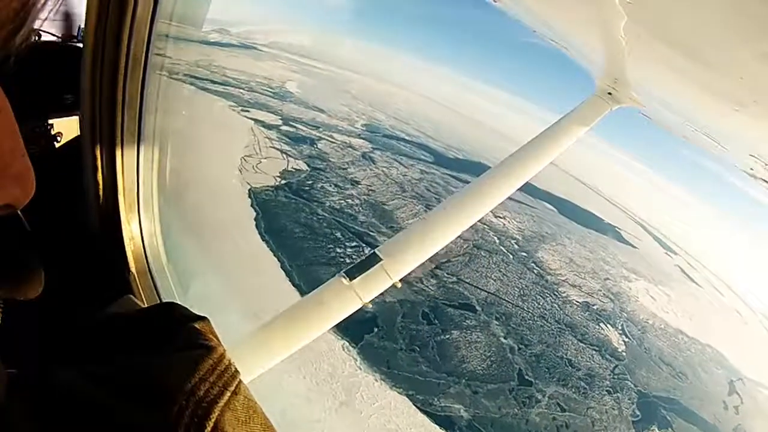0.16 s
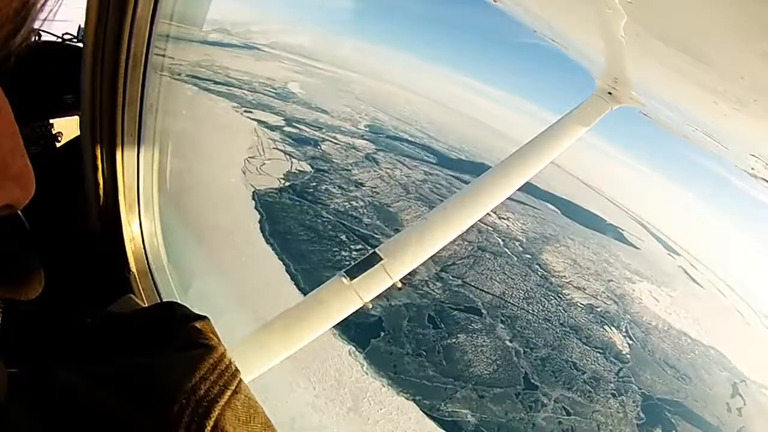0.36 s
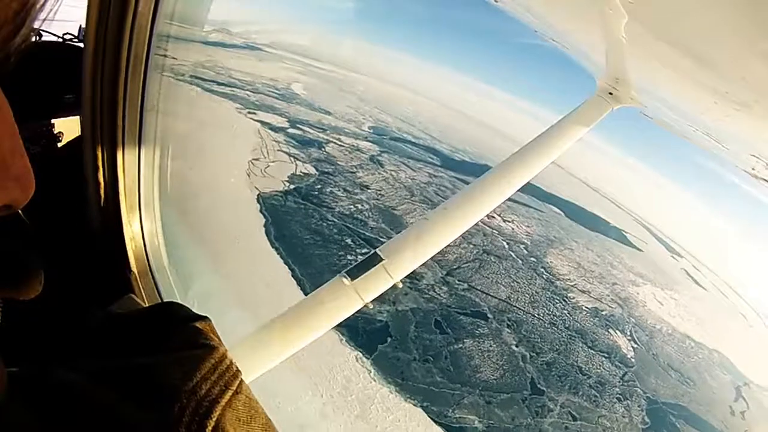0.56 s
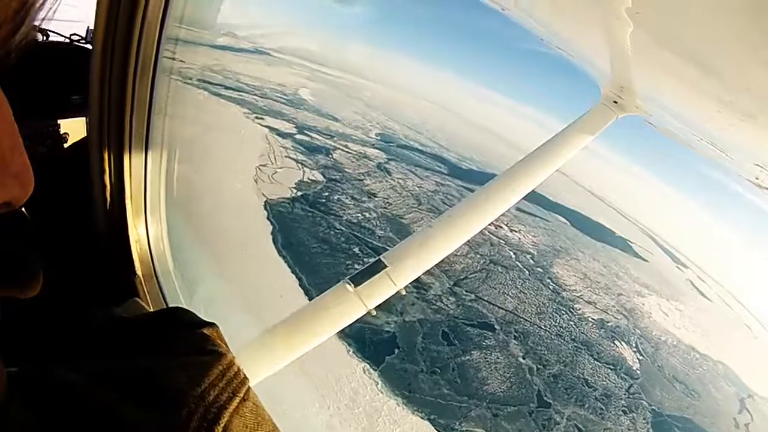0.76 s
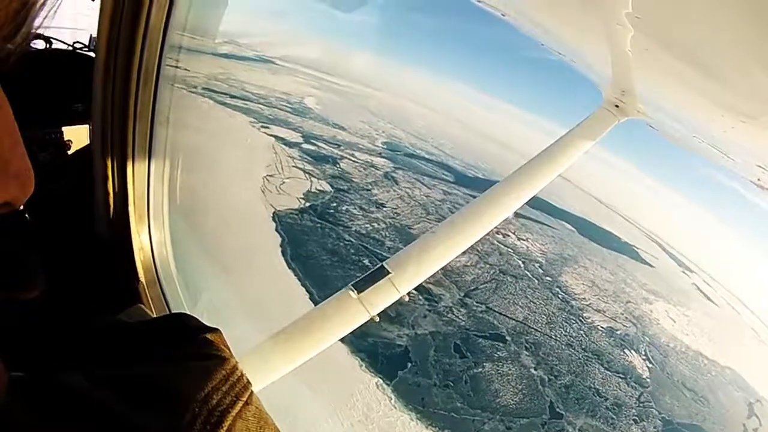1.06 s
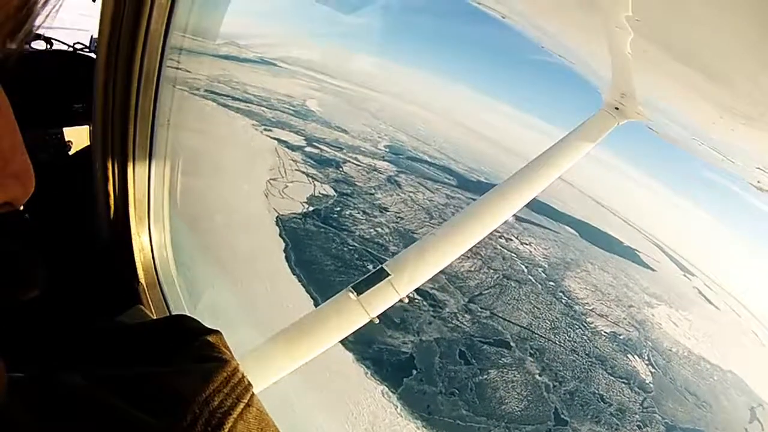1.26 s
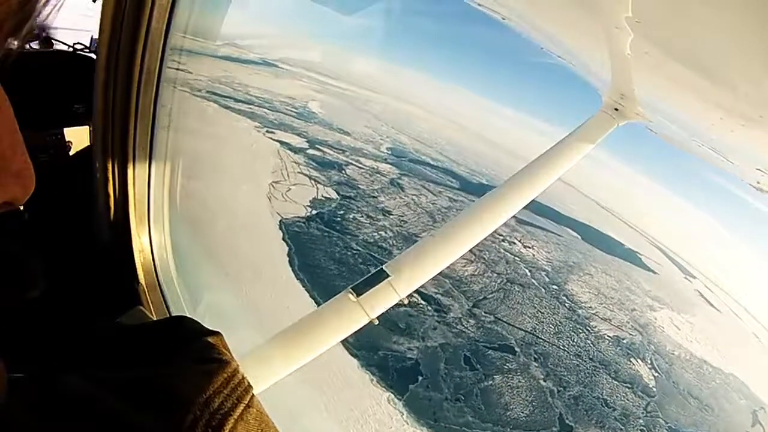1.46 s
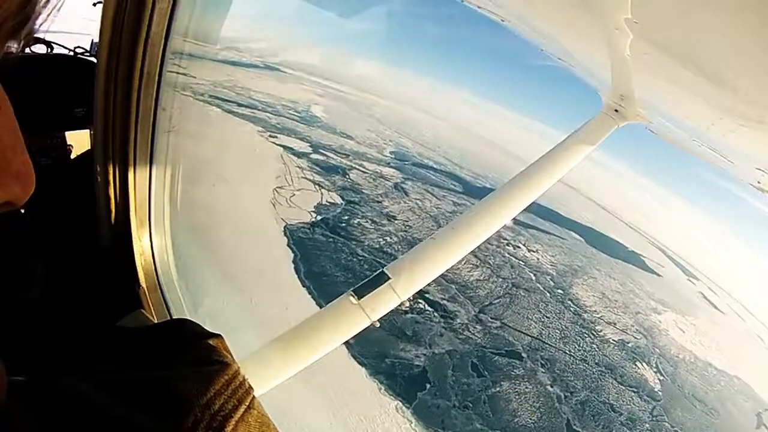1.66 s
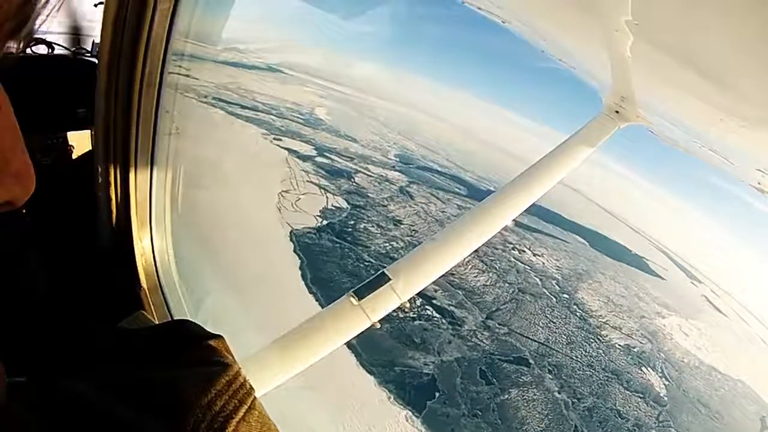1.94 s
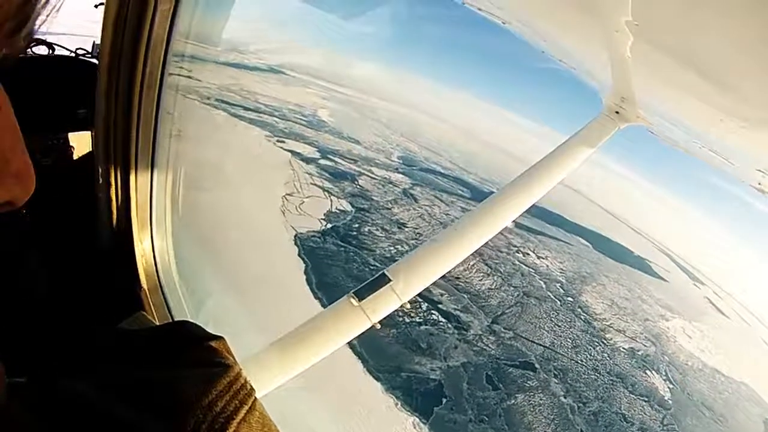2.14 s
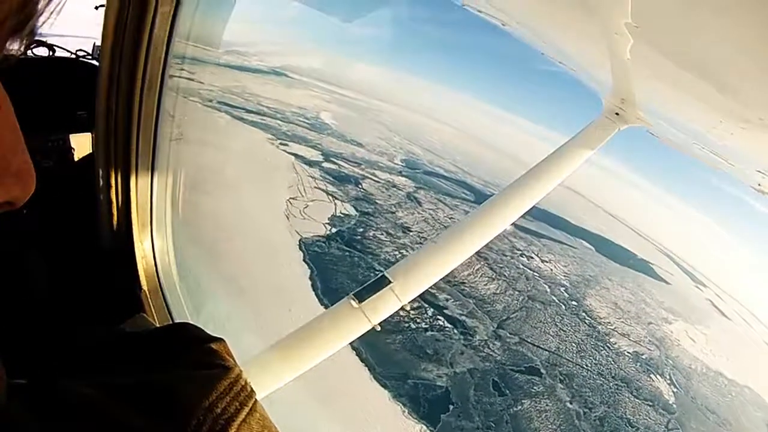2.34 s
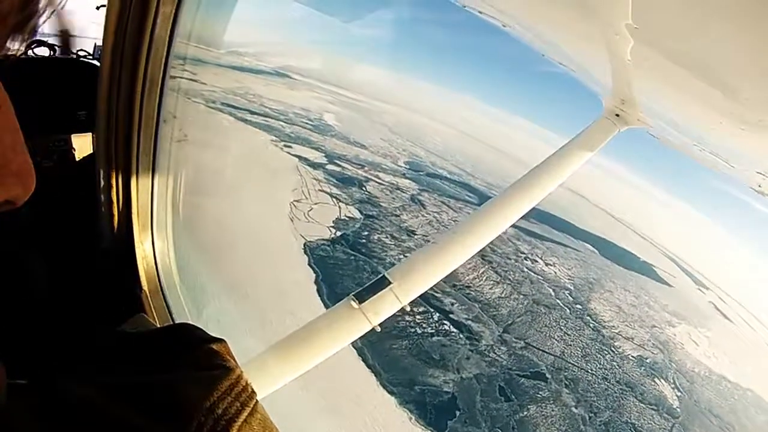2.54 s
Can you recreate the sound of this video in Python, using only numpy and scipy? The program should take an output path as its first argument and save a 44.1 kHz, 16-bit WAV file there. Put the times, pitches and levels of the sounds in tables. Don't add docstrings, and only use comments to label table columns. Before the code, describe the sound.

Constant low, throbbing engine drone inside a small plane in flight, with rattling panels and dull wind roar beneath; a muffled microphone clips with irregular ticks and thumps, its level briefly ducking and recovering.

```python
import sys
import numpy as np
from scipy import signal
from scipy.io import wavfile
from scipy.ndimage import uniform_filter1d

SR = 44100
rng = np.random.default_rng(int(sys.argv[2]) if len(sys.argv) > 2 else 0)


def master_out(mix):
    frames = np.transpose(np.atleast_2d(mix))
    ceiling = np.clip(frames, -1, 1)
    pcm = np.round(ceiling * 32767).astype(np.int16)
    wavfile.write(sys.argv[1], SR, pcm)


def invert_db(x):
    u = np.asarray(x, float) / 20
    return 10 ** u


N = 119070

# t/s, f/Hz
FIRING_RATE = [
    (0, 83.05),
    (.5, 83.03),
    (1.08, 82.8),
    (1.66, 82.96),
    (2.3, 83.15),
    (2.7, 83.15),
]
# multiple of the firing rate, level/dB
ORDERS = [(.25, -13), (1, 4.5), (1.25, -4.5), (1.75, -12), (2, 0), (2.5, -15), (2.75, -18), (3, -4),
          (3.25, -8.5), (4, -2), (5, -3.5), (5.25, -9.5), (6, -5.5), (6.5, -10), (6.75, -9.5), (7, -5),
          (7.25, -8), (7.75, -4), (8, -10.5), (8.75, -13.5), (8.25, -13.5), (9, -9.5), (9.5, -16.5),
          (10, -18), (11.25, -20.5), (12, -21), (15, -34)]
# level/dB, lateness/ms
CYLINDER_KNOCKS = [
    (0.5, 2.5),
    (0, 1.17),
    (-5, -1.5),
    (-6, 0.75),
]
# f/Hz, bandwidth/Hz, level/dB
PANEL_MODES = [
    (237.6, 20, 2.5),
    (403, 60, -14.5),
    (620, 130, 2),
    (810, 60, -6.5),
    (860, 160, -24.5),
]
# f/Hz, level/dB
ROAR_SPECTRUM = [
    (26, -16),
    (72, -10),
    (205, -1),
    (650, -0.5),
    (1210, -23),
    (2450, -38.5),
    (2950, -47.5),
    (3400, -44.5),
]
# t/s, tick level/dB, crack level/dB, gain drop/dB
OVERLOAD_EVENTS = [(0.035, -61, -66, 7.5), (0.0824, -62.5, -71, 11), (0.218, -67.5, -62, 6),
                   (0.3232, -61, -52.5, 2), (0.395, -63, -54, 8.5), (0.4569, -64, -64, 5.5),
                   (0.5036, -67, -59, 7.5), (0.6124, -58.5, -42.5, 8), (0.6499, -60, -61, 5.5),
                   (.698, -67, -56, 7), (.7935, -68, -45, 14.5), (0.89, -63, -65, 6.5),
                   (1.0048, -65, -52, 7), (1.1333, -64, -76, 5), (1.2887, -62, -63, 13),
                   (1.3245, -62.5, -60, 9), (1.3738, -61.5, -70, 13), (1.518, -60.5, -64, 9.5),
                   (1.6144, -62, -47, 10.5), (1.6503, -62, -63, 8), (1.8087, -61, -57, 5.5),
                   (1.87, -63, -59, 9.5), (1.952, -65.5, -45.5, 12.5), (2.0494, -61, -65, 7),
                   (2.1449, -66, -59, 10.5), (2.193, -58, -46, 14.5), (2.2717, -61.5, -58, 2.5),
                   (2.4822, -61, -53, 8), (2.5908, -60, -45, 11), (2.6261, -61, -75, 14.5)]
# t/s, tick level/dB, gain drop/dB
LIGHT_TOUCHES = [(.009, -63, 4), (.1566, -68, 1), (.1777, -64, 2), (.2735, -68, 1), (.3529, -68, 4),
                 (.3733, -66, 3), (.4206, -68, 1), (.4917, -67, 1), (.5519, -64, 4), (.7463, -64, 1),
                 (.8415, -66, 1), (.8689, -65, 1), (.9399, -66, 3), (.981, -67, 1), (1.0718, -66, 1),
                 (1.0821, -67, 2), (1.21, -65, 3), (1.2222, -68, 3), (1.2444, -68, 1), (1.3559, -68, 1),
                 (1.4481, -62, 6), (1.4729, -67, 2), (1.7047, -65, 4), (1.7531, -60, 3), (1.7727, -66, 1),
                 (1.8488, -68, 1), (1.8605, -67, 1), (2.0128, -62, 5), (2.1077, -66, 1), (2.2995, -68, 1),
                 (2.3205, -66, 7), (2.372, -66, 1), (2.3867, -61, 2), (2.4339, -61, 3), (2.5292, -59, 4),
                 (2.6733, -61, 2)]

CRANK_START = -.043
TONES_DB, PHASE_LEAN_RAD = -31.5, 0.99
WAVER_DB, WAVER_RAD = 1.6, .21
KNOCK_DB, KNOCK_SPREAD_DB, KNOCK_JITTER_MS = -33.5, 5, 0.2
KNOCK_RISE_MS = 0.65
ROAR_DB, PATCHY_DB, FLICKER_DB = -23, 0.5, 1.8
ROAR_SLOPE_DB_PER_OCT = -23
THROB_DB = 0.7
CYCLE_DB, CYCLE_RAD = 0.62, 3.3
SNAP_MS, RECOVER_MS = .33, 18
TICK_DB, TICK_HZ, CHATTER_MS, DULL_HZ = 29.5, 1500, 1.4, 8500
SMALL_TICK_DB, SMALL_SPREAD_DB = -50, 5
STRAY_PER_S, STRAY_DB = 750, -63.5
BLOW_DB, DIVE_MS, REBOUND_MS = -15, 1.3, 1.8
CRACK_DB, CRACK_HZ, CRACK_MS = 11, 1500, .5
LEAD = 2048
BASS_CUT_HZ, EDGE_HZ = 99, 10000
CEILING, FADE_MS = .56, 2


def evened(x):
    return x / np.sqrt(np.mean(x ** 2) + 1e-20)


def wander(rate_hz):
    t = np.arange(0, N + 32, 32) / SR
    rates = rate_hz * np.geomspace(.05, 1, 12)
    slow = sum(np.sin(2 * np.pi * (f * t + rng.random())) for f in rates)
    return np.interp(np.arange(N) / SR, t, evened(slow))


def firings():
    s, hz = np.transpose(FIRING_RATE)
    rate = np.interp(np.arange(N) / SR, s, hz)
    return np.cumsum(rate) / SR + 4 * CRANK_START


def tones(turns):
    out = np.zeros(N)
    for order, db in ORDERS:
        k = round(4 * order) / 4
        phase = 2 * np.pi * k * turns + PHASE_LEAN_RAD * np.log2(k) + WAVER_RAD * np.cbrt(k) * wander(8)
        out += invert_db(db + WAVER_DB * wander(9.3)) * np.cos(phase)
    return invert_db(TONES_DB) * np.sqrt(2) * out


def train(turns, level_db, late_ms):
    at = np.flatnonzero(np.diff(np.floor(turns)) > 0)
    delay = (late_ms[:len(at)] * SR / 1000).astype(int)
    out = np.zeros(N)
    out[np.clip(at + delay, 0, N - 1)] = invert_db(level_db[:len(at)])
    return out


def panels(turns):
    first = int(np.floor(turns[0]) + 1)
    db, late = np.roll(np.tile(CYLINDER_KNOCKS, (80, 1)), -first, axis=0).T
    luck = rng.standard_normal((len(db), 2))
    t = np.arange(3000) / SR
    ring = np.zeros(3000)
    for hz, width, level in PANEL_MODES:
        ring += invert_db(level) * np.exp(-np.pi * width * t) * np.sin(2 * np.pi * hz * t)
    ring *= 1 - np.exp(-(1000 * t / KNOCK_RISE_MS) ** 2)
    knocks = train(turns, db + KNOCK_SPREAD_DB * luck[:, 0], late + KNOCK_JITTER_MS * luck[:, 1])
    return invert_db(KNOCK_DB) * evened(signal.oaconvolve(knocks, ring)[:N])


def roar(turns):
    frames, hz = N // 256 + 5, np.fft.rfftfreq(1024, 1 / SR)
    real, imag, patches = rng.standard_normal((frames, 513, 3)).T
    patches = uniform_filter1d(patches, size=10, axis=0)
    patches = evened(uniform_filter1d(patches, size=8, axis=1))
    f, db = np.transpose(ROAR_SPECTRUM)
    octave = np.log2(hz + 1)
    above = np.maximum(octave - np.log2(f[-1]), 0)
    colour = np.interp(octave, np.log2(f), db) + ROAR_SLOPE_DB_PER_OCT * above
    spectrum = (real + 1j * imag) * invert_db(colour[:, None] + PATCHY_DB * patches)
    noise = signal.istft(spectrum, nperseg=1024, noverlap=768)[1][:N]
    flicker = FLICKER_DB * np.clip(wander(150), -2, 1.5)
    throb = THROB_DB * np.cos(2 * np.pi * turns)
    cycle = CYCLE_DB * np.cos(np.pi * turns / 2 + CYCLE_RAD)
    return invert_db(ROAR_DB + flicker + throb + cycle) * evened(noise)


def limiter_db():
    since, drop = np.arange(-441, 6000) * 1000 / SR, np.zeros(N)
    for s, *_, db in [*OVERLOAD_EVENTS, *LIGHT_TOUCHES]:
        drop[int(s * SR)] = max(db, 0)
    snap = .5 + .5 * np.tanh(since / SNAP_MS)
    creep = snap * np.exp(-abs(since) / RECOVER_MS)
    return -signal.oaconvolve(drop, creep)[441:441 + N]


def ticks(edge):
    t = np.arange(-100, 200) * 1000 / SR
    spell = signal.oaconvolve(edge, np.exp(-(t / CHATTER_MS) ** 2))[100:100 + N]
    chatter = spell * rng.standard_normal(N)
    u = 2 * np.pi * TICK_HZ * np.arange(200) / SR
    click = (1 - u / 2) * u * np.exp(-u)
    sharp = signal.oaconvolve(edge + .22 * chatter, click)[:N]
    return signal.sosfilt(signal.butter(3, DULL_HZ, fs=SR, output="sos"), sharp)


def blows(turns):
    t = np.arange(-441, 882) * 1000 / SR
    cut = .5 + .5 * np.tanh(t / SNAP_MS)
    dip = cut * np.exp(-abs(t) / REBOUND_MS) - (1 - cut) * np.exp(-abs(t) / DIVE_MS)
    crack = np.sin(2 * np.pi * CRACK_HZ * t / 1000) * np.exp(-(t / CRACK_MS) ** 2)
    s, tick_db, crack_db, _ = np.transpose(OVERLOAD_EVENTS)
    big, cracks, edge = np.zeros((3, N))
    at = (s * SR).astype(int)
    big[at] = invert_db(BLOW_DB)
    cracks[at] = invert_db(CRACK_DB + crack_db)
    edge[at] = invert_db(TICK_DB + tick_db)
    s, tick_db, _ = np.transpose(LIGHT_TOUCHES)
    edge[(s * SR).astype(int)] = invert_db(TICK_DB + tick_db)
    luck = rng.standard_normal((320, 2))
    edge += train(turns, SMALL_TICK_DB + SMALL_SPREAD_DB * luck[:, 0], -3 + 0.4 * luck[:, 1])
    stray = invert_db(STRAY_DB + SMALL_SPREAD_DB * rng.standard_normal(N))
    edge += stray * (rng.random(N) < STRAY_PER_S / SR)
    struck = signal.oaconvolve(big, dip) + signal.oaconvolve(cracks, crack)
    return struck[441:441 + N] + ticks(edge)


def scene():
    turns = firings()
    cabin = tones(turns) + panels(turns) + roar(turns)
    return (cabin * invert_db(limiter_db()) + blows(turns))[None]


def top_cut(x):
    return signal.sosfilt(signal.butter(12, 11240, fs=SR, output="sos"), x)


def record(dry):
    longer = np.pad(dry, ((0, 0), (LEAD, LEAD)), "reflect", reflect_type="odd")
    thin = signal.sosfilt(signal.butter(1, BASS_CUT_HZ, "high", fs=SR, output="sos"), longer)
    drive = thin / CEILING
    soft = CEILING * np.tanh(drive * (1 + drive ** 2 / 3))
    edge = signal.firwin(127, EDGE_HZ, fs=SR)[None]
    low = signal.oaconvolve(soft, edge, "same")[:, LEAD:LEAD + N]
    left_ms = np.arange(N)[::-1] * 1000 / SR
    mix = low * np.sin(np.pi / 2 * np.minimum(left_ms / FADE_MS, 1)) ** 2
    return top_cut(mix)


dry = scene()
out = record(dry)
master_out(out)
```